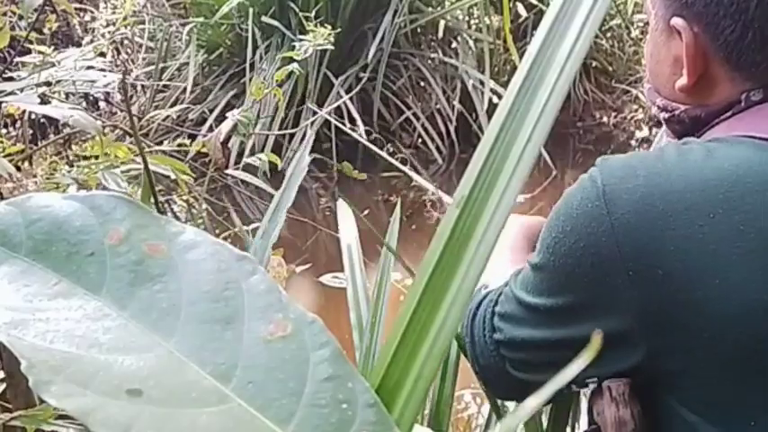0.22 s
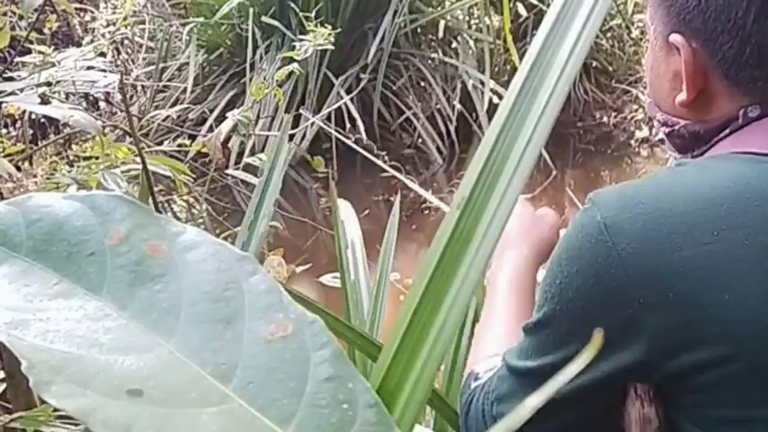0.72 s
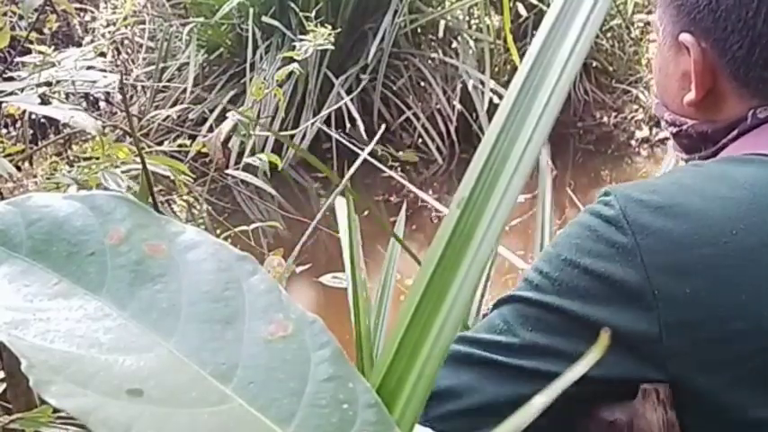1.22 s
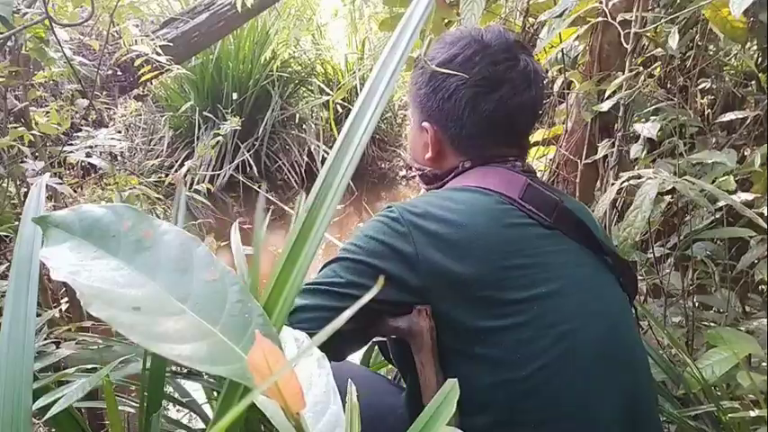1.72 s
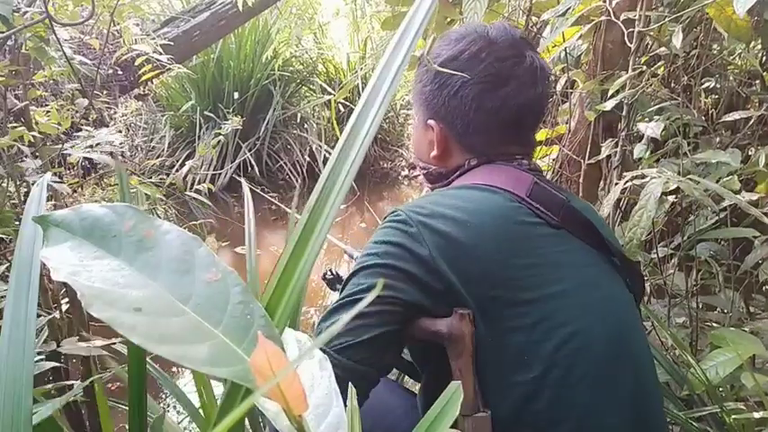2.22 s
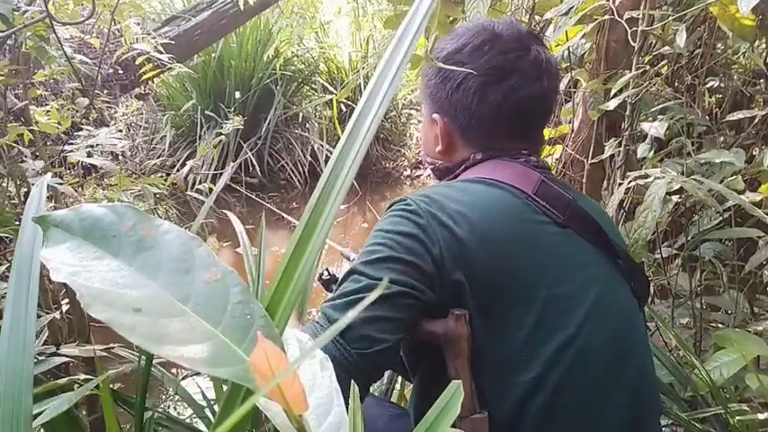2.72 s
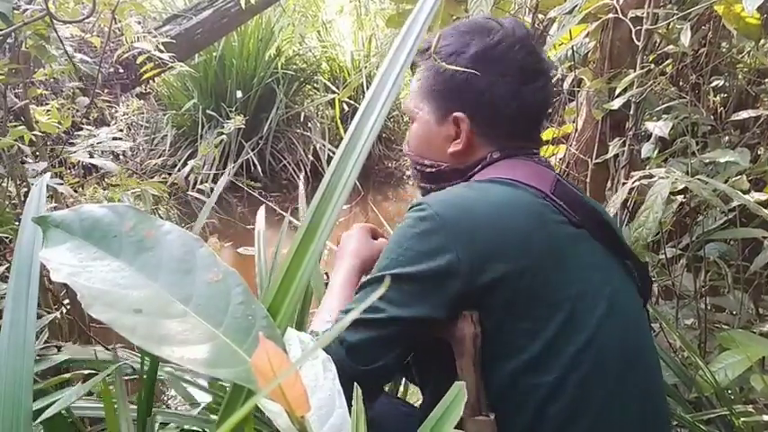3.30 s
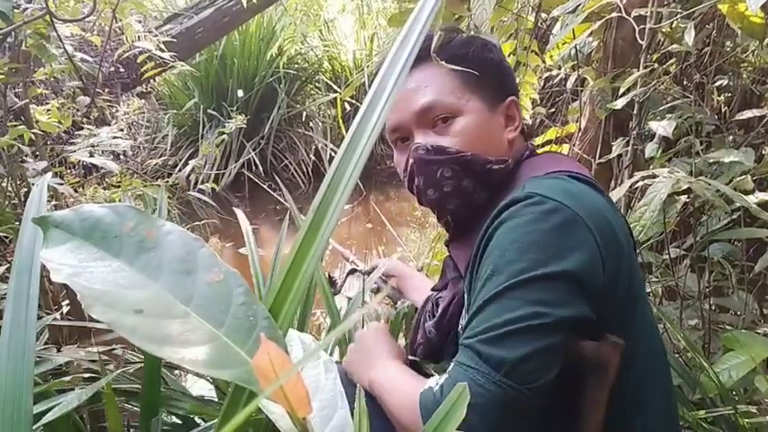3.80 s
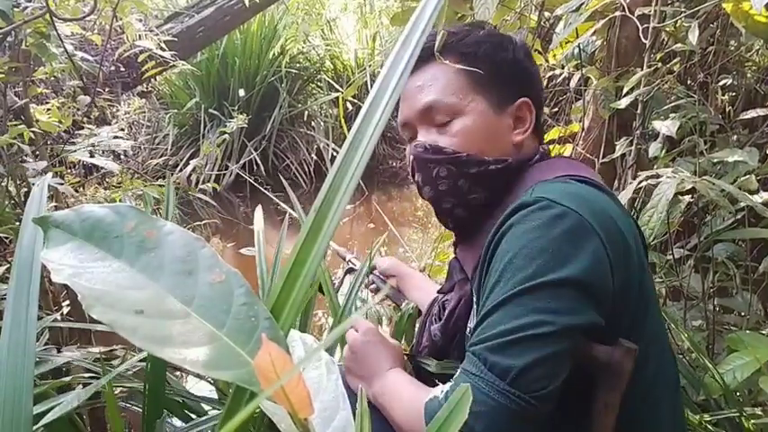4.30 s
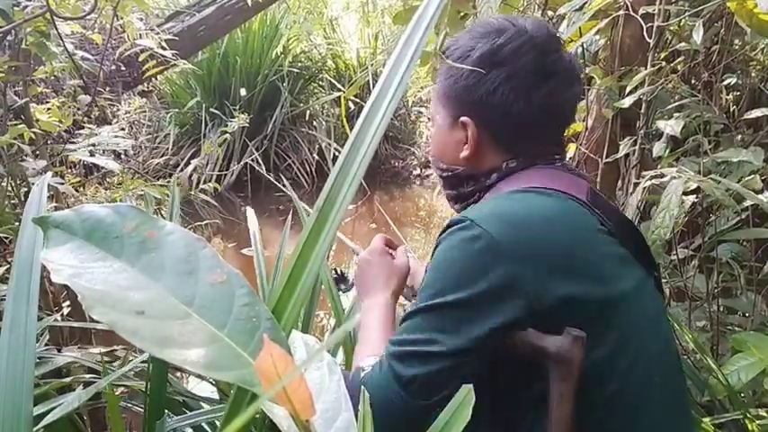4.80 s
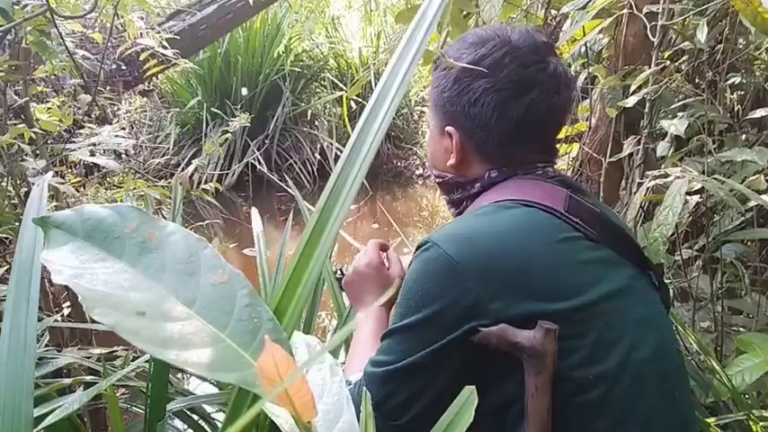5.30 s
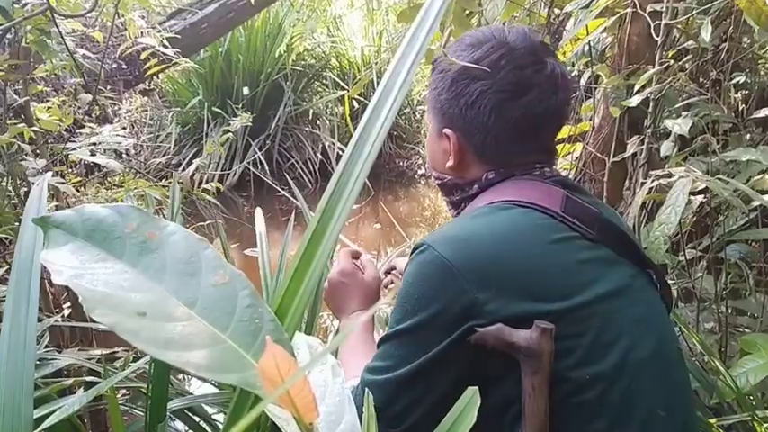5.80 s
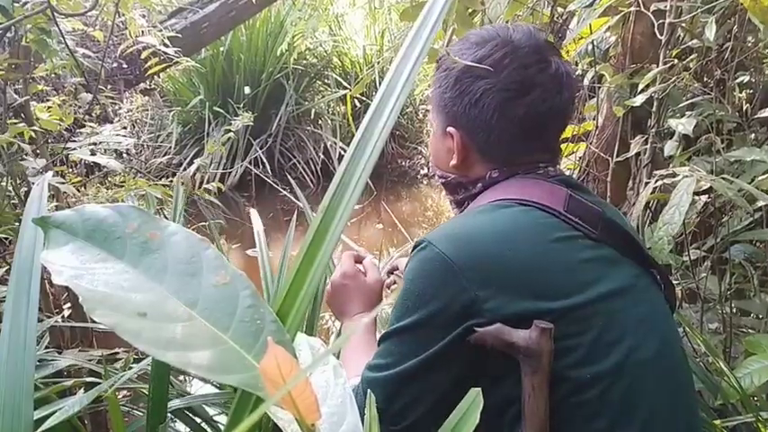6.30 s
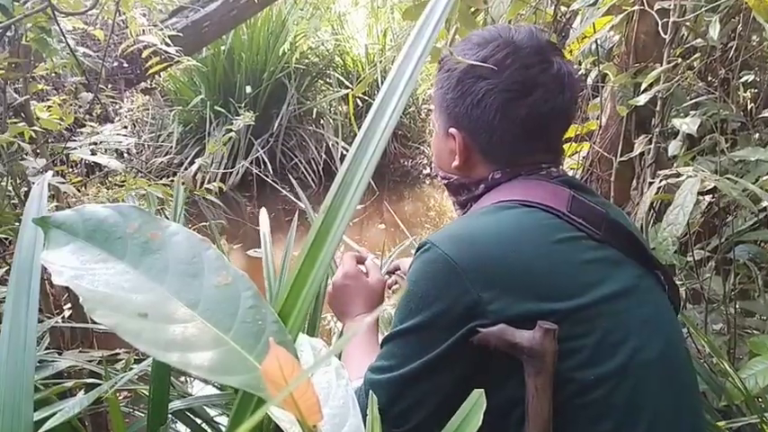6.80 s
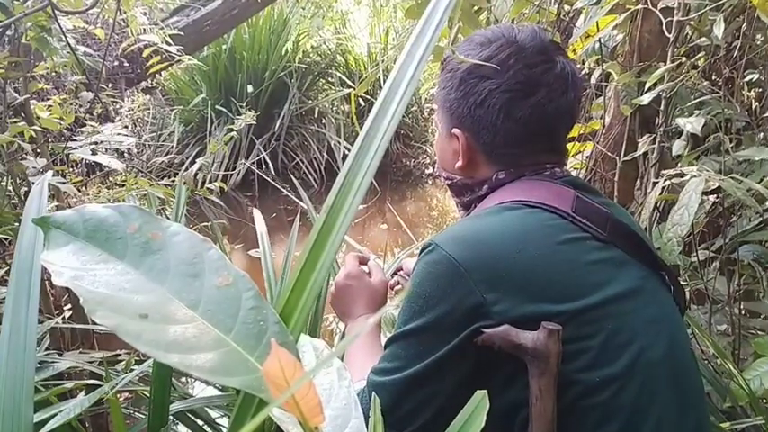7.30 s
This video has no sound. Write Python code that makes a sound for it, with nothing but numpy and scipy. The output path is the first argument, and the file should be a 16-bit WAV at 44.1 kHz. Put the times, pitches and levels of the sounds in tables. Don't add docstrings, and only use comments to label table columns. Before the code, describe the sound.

Shrill insect drone and echoing bird buzzes and trills in a forest, with a burst of close leaf scraping and stem snaps early on.

```python
import sys
import numpy as np
from scipy import signal
from scipy.fft import rfft, irfft
from scipy.io import wavfile
from scipy.ndimage import uniform_filter1d

SR = 44100
rng = np.random.default_rng(int(sys.argv[2]) if len(sys.argv) > 2 else 0)


def store_pcm(level_fs):
    pcm = np.round(np.clip(level_fs, -1, 1) * 32767).astype(np.int16)
    wavfile.write(sys.argv[1], SR, np.atleast_2d(pcm).T)


def field_ratio(decibels):
    return 10 ** (np.asarray(decibels, dtype=float) / 20)


N = 331632
T = np.arange(N) / SR


def evened(x):
    return x / np.sqrt(np.mean(x ** 2) + 1e-20)


def curve(tables, column):
    rows = np.vstack(tables)
    return np.interp(T, rows[:, 0], rows[:, column])


def add(mix, s, sound):
    part = mix[..., max(round(s * SR), 0):][..., :sound.shape[-1]]
    part += sound[..., :part.shape[-1]]


def coloured(x, points, stretch=1):
    hz = np.fft.rfftfreq(len(x), 1 / SR)
    point_hz, point_db = np.transpose(points)
    gain_db = np.interp(np.log(hz / stretch + 1), np.log(point_hz), point_db, -90, -90)
    return irfft(rfft(x) * field_ratio(gain_db), len(x))


def slow(hz):
    return evened(signal.lfilter([1], [1, -np.exp(-2 * np.pi * hz / SR)], rng.standard_normal(N)))


def ring(x, hz, width):
    turn = np.exp(2j * np.pi * hz * T)
    r = np.exp(-np.pi * width / SR)
    return (turn * signal.lfilter([1], np.convolve([1, -r], [1, -r]), x / turn)).real


def split(x, hz):
    low = signal.sosfilt(signal.butter(2, hz, fs=SR, output="sos"), x)
    return low, x - low


def choir(shape, db, octave_db):
    strength = field_ratio(0.29 * rng.exponential(1, N))
    clicks = strength * (rng.random(N) < .12) * rng.choice([-1, 1], N)
    body = evened(coloured(clicks, shape))
    octave = evened(coloured(clicks[::-1], shape, 2.03))
    return field_ratio(db + 0.47 * slow(5.5)) * (body + field_ratio(octave_db) * octave)


def cicadas():
    # pitch_hz, level_db (per Hz)
    low_band = [(5700, -36), (6000, -34.5), (6300, -21), (6700, -9), (7000, -5), (7500, -12.5), (8200, -32),
                (8700, -27.5), (9100, -37)]
    high_band = [(7000, -22), (7400, 1.5), (7800, 2), (8150, 2), (8500, -6.5), (8800, -17), (9200, -29.5)]
    # time_s, low_choir_db, high_choir_db
    loudness = [
        [(0.0, -49.5, -49), (0.626, -49.5, -47), (1.49, -50, -46.5)],
        [(1.52, -58.5, -72), (2.15, -46.5, -40.5), (2.9, -49.5, -51), (5.81, -49.5, -46.5),
         (7.52, -48.5, -54.5)],
    ]
    low_choir = choir(low_band, curve(loudness, column=1) + 1.65, 0.29)
    high_choir = choir(high_band, curve(loudness, column=2) - 1.5, -23)
    return low_choir + high_choir


def crickets():
    # time_s, steady_db, throbbing_db
    loudness = [(0, -77.5, -75), (.8, -63.5, -69.5), (1, -79, -57), (1.5, -73, -71), (1.51, -47.5, -45.5),
                (2.12, -48, -76.5), (2.25, -57, -53.5), (4, -76, -56), (6.2, -79, -60), (6.5, -65, -68),
                (7.2, -76, -68), (7.52, -74.5, -104)]
    # start_s, length_s, level_db
    rattles = [
        (.05, .05, -60),
        (.67, .04, -55),
        (.745, .025, -53),
        (1.455, .035, -52),
        (5.48, .07, -57),
        (6.16, .04, -58),
    ]
    steady = evened(ring(rng.standard_normal(N), hz=4760, width=300))
    pulses = np.cos(2 * np.pi * 12.78 * (T - 2.705))
    throb = np.maximum(pulses - .2, 0) * field_ratio(2.2 * slow(7.4))
    thin = evened(np.sin(2 * np.pi * np.cumsum(7768 + 18 * slow(15.1)) / SR) * throb)
    click_count = np.floor(np.cumsum(165 + 25 * slow(66)) / SR)
    rattle = evened(ring(np.diff(click_count, prepend=0), hz=5200, width=1200))
    gate = np.zeros(N)
    for s, length, db in rattles:
        add(gate, s, field_ratio(db) * np.hanning(round(length * SR)))
    steady_gain = field_ratio(curve(loudness, column=1))
    thin_gain = field_ratio(curve(loudness, column=2))
    return steady_gain * steady + thin_gain * thin + gate * rattle


def air():
    # pitch_hz, level_db (per Hz)
    hush_shape = [(12, -21), (20, 6), (77, -8), (126, -6.5), (163, -8), (449, -13.5), (596, -13.5),
                  (1610, -19), (1940, -19.5), (2400, -17.5), (5600, -39), (7280, -73), (12300, -120)]
    # time_s, level_db
    rumble_level = [
        (0.0, -57),
        (0.48, -52.5),
        (0.58, -55),
        (2.05, -54),
        (5.01, -53.5),
        (6.43, -47.5),
        (7.52, -53.5),
    ]
    hush = field_ratio(-58) * evened(coloured(rng.standard_normal(N), hush_shape))
    hiss = field_ratio(-67.0) * split(rng.standard_normal(N), hz=4500)[1]
    rumble = evened(ring(rng.standard_normal(N), hz=74.3, width=50.0))
    return hush + hiss + field_ratio(curve(rumble_level, column=1) - 7.0) * rumble


def rustling():
    # time_s, rustle_db
    stir = [(0, -64.5), (.41, -71.5), (.6, -64.5), (.94, -74), (1.3, -63.5), (1.36, -70), (1.5, -53),
            (1.515, -46.5), (2.36, -53.5), (2.6, -53.5), (2.89, -63), (3.2, -57.5), (3.6, -76.5),
            (4.22, -57), (4.6, -66), (5.38, -70), (5.91, -64), (7.52, -74)]
    # peak_s, length_s, level_db, heavy_blades_relative_db
    brushes = [(0.552, 0.0264, -51.5, 1), (0.996, 0.13, -61, -12.5), (1.33, 0.033, -63, -6),
               (1.64, 0.22, -44, 5), (1.733, 0.042, -52, 9), (1.892, 0.28, -46, 5.5),
               (2.002, 0.16, -46, -1.5), (2.125, 0.032, -40.5, -9), (2.18, 0.26, -45, 3.5),
               (2.32, 0.13, -44, 2), (2.424, 0.046, -49, 1), (2.5, 0.083, -50, -1),
               (2.69, 0.19, -53.5, -10), (3.116, 0.098, -54, -16), (3.28, 0.26, -55, 2.5),
               (3.5, 0.27, -58.5, 6), (3.746, 0.21, -64.5, 2), (4.546, 0.014, -53, -17),
               (4.74, 0.125, -60.5, 0), (5.505, 0.147, -76, -2), (5.953, 0.044, -69, 2),
               (6.174, 0.23, -58, 2), (6.954, .06, -67, 5)]
    stir_db = curve(stir, column=1)
    heavy_stir_db = stir_db + 2.5 - 0.4612 * (stir_db + 50.5)
    power = field_ratio(2 * np.array([stir_db, heavy_stir_db]))
    rise_share = 0.43
    for s, length, db, heavy_db in brushes:
        side = np.where(T < s, rise_share, 1 - rise_share) * length
        peak = field_ratio(2 * np.array([[db], [db + heavy_db]]))
        power = power + peak * np.exp(-2 * (abs(T - s) / side) ** 1.57)
    return np.sqrt(power)


def patchy(x):
    z = signal.stft(x, nperseg=256)[2]
    patches = uniform_filter1d(rng.standard_normal(z.shape), size=5, axis=0)
    patches = uniform_filter1d(patches, size=6, axis=1)
    return signal.istft(z * field_ratio(2.1 * evened(patches)), nperseg=256)[1][:N]


def leaves():
    # pitch_hz, level_db (per Hz)
    leaf_shape = [(71, -60), (120, -15), (173, -17), (249, -14), (390, -12.5), (700, -8), (1000, -7),
                  (1350, -7), (1680, -7), (2850, -3), (3430, -7), (4840, -8.5), (5470, -10), (7880, -1),
                  (9270, -11), (12300, -10), (15400, 3.5)]
    strength = field_ratio(1.3 * np.minimum(rng.exponential(1, N), 4))
    grains = strength * (rng.random(N) < .06) * rng.choice([-1, 1], N)
    catches = rng.random(N) * (rng.random(N) < 110 / SR)
    clumps = .6 + signal.lfilter([1], [1, -np.exp(-1 / (.007 * SR))], catches)
    scrape = (evened(grains) + 0.92 * rng.standard_normal(N)) * clumps ** 0.25
    low, high = split(evened(patchy(coloured(scrape, leaf_shape))), hz=2600)
    light, heavy = rustling()
    return field_ratio(12.0) * light * high + field_ratio(9.5) * heavy * low


def whistle(hz, db, far, edge=.3, shake=0.4):
    chance = uniform_filter1d(rng.standard_normal((2, len(hz))), size=120) * np.sqrt(120)
    waver, flutter = shake * chance
    phase = 2 * np.pi * np.cumsum(hz * (1 + 0.0178 * waver)) / SR
    tone = field_ratio(db + 0.5 + 4.0 * flutter) * np.sin(phase)
    tone *= signal.windows.tukey(len(hz), edge)
    far = np.clip(far, 0, 1) * np.ones(len(hz))
    return tone * np.array([np.cos(far * np.pi / 2), np.sin(far * np.pi / 2)])


def note(length, first, last, db, far):
    hz = np.linspace(first, last, round(length * SR))
    return whistle(hz, db - 12 * np.maximum(1 - hz / first, 0), far, 0.26, shake=0.19 + 1.4 * far)


def buzz(length, last_db, pitch, centre):
    # length_share (0-1), low_hz, high_hz
    reach = [
        (0, 2852, 3990),
        (.3, 2600, 4217),
        (0.7, 2472, 4318),
        (.88, 2825, 4333),
        (1.002, 3533, 4190),
    ]
    # length_share (0-1), relative_db, distance (0-1)
    swell = [
        (0, -7, 0.46),
        (.28, -8, 0.76),
        (.65, -2, 0.73),
        (1, 0, 1),
    ]
    t = np.arange(0, length, 1 / SR)
    share, low, high = np.transpose(reach)
    low = pitch * np.interp(t / length, share, low)
    high = pitch * np.interp(t / length, share, high)
    share, swell_db, far = np.transpose(swell)
    uneven = evened(uniform_filter1d(rng.standard_normal(len(t)), size=900))
    turns = 2 * np.pi * (56 * t + rng.random() + .07 * uneven)
    height = .5 + signal.sawtooth(turns, .6) / 2
    height = uniform_filter1d(height, size=130)
    off_centre = height - centre - 0.015 * t / length
    db = last_db + np.interp(t / length, share, swell_db) - 30 * off_centre ** 2
    db = db + 1.5 + 0.77 * np.sin(turns)
    return whistle(low + (high - low) * height, db, np.interp(t / length, share, far), 0.022)


def syllable(shape, db, far):
    s, hz, shape_db = np.transpose(shape)
    t = np.arange(0, s[-1], 1 / SR)
    pitch = uniform_filter1d(np.interp(t, s, hz), size=60)
    return whistle(pitch, db + np.interp(t, s, shape_db), far, 0.079)


def buzzing_bird():
    # start_s, length_s, final_level_db, reach_factor, loudest_height (0-1)
    buzzes = [
        (0, 0.21, -46.5, 0.93, 0.65),
        (0.622, 0.3, -37, 1, 0.54),
        (1.032, 0.17, -48.5, 1.01, 0.35),
        (1.505, 0.19, -34.5, 0.99, 0.5),
        (2.743, 0.3, -36, 0.99, 0.6),
        (4.087, 0.36, -38, 0.99, 0.61),
        (5.186, 0.37, -39.5, 0.9943, 0.61),
        (5.999, 0.12, -46.5, 0.98, 0.4),
        (6.489, 0.34, -39.5, 1.04, 0.59),
    ]
    # time_s, pitch_hz, level_db
    hook = [(0, 3724, -4), (.007, 3487, 10.5), (.012, 2513, 9.5), (.018, 2445, -5), (.022, 3379, 10.5),
            (.029, 4150, 12), (.037, 4500, -1.5), (.062, 4250, -20)]
    step = [(0, 3673, -5), (.01, 3355, -6), (.018, 3060, -7), (.024, 3724, 0.5), (.031, 4265, -2),
            (.036, 4420, -9), (.058, 4300, -32)]
    drop = [(0, 4483, -2.5), (.006, 3805, 0.5), (.014, 2505, 1), (.022, 2047, -16), (.027, 2750, 4.5),
            (.033, 3284, 0), (.056, 3150, -10)]
    # start_s, level_db, distance (0-1)
    hooks = [
        (0.445, -43, 0.51),
        (2.53, -49, 0.8),
        (3.925, -46, 0.7),
    ]
    steps = [
        (3.725, -47, 0.76),
        (4.742, -45, 0.98),
        (5.021, -35, 0.8),
        (5.681, -46, 1),
        (6.301, -33, 0.54),
    ]
    drops = [
        (1.2, -38.5, 0.56),
        (2.526, -36, 0.36),
        (5.92, -38, 0.63),
    ]
    # start_s, length_s, first_hz, level_db
    closers = [
        (.925, 0.046, 3960, -34),
        (.195, 0.023, 3730, -54),
        (.985, 0.029, 4020, -45),
        (1.742, 0.055, 3600, -35),
        (1.818, .01, 3920, -39),
        (4.43, 0.052, 3977, -38.5),
        (5.53, 0.065, 4040, -35),
        (6.82, 0.051, 3790, -42),
    ]
    # start_s, length_s, pitch_hz, level_db
    chips = [(0.548, 0.011, 3013, -38.5), (.564, 0.021, 3160, -39), (0.597, 0.0052, 3113, -36.5),
             (1.313, 0.0079, 2450, -36.5), (1.352, .01, 3270, -58), (1.367, 0.01, 3200, -57),
             (2.639, 0.0089, 2480, -33.5), (4.035, 0.013, 3150, -39.5), (4.058, 0.012, 3100, -39),
             (5.138, 0.04, 3127, -43.5), (5.19, 0.012, 3120, -44), (6.415, 0.045, 3050, -42),
             (1.257, 0.029, 3230, -47), (1.31, .012, 3260, -52), (1.205, 0.0074, 3900, -36),
             (0.633, .01, 2450, -47)]
    paths = np.zeros((2, N))
    for s, *row in buzzes:
        add(paths, s, buzz(*row))
    for shape, sung in ((hook, hooks), (step, steps), (drop, drops)):
        for s, db, far in sung:
            add(paths, s, syllable(shape, db, far))
    for s, length, first, db in closers:
        add(paths, s, note(length, first, 3962, db, far=0.2))
    for s, length, hz, db in chips:
        add(paths, s, note(length, hz, hz, db, far=0.37))
    return paths


def other_calls():
    # start_s,
    # length_s, first_hz, last_hz, level_db
    far_notes = [(.005, 0.018, 3940, 4060, -54), (1.27, 0.034, 3830, 3850, -58),
                 (.31, 0.045, 3800, 3780, -62), (1.605, 0.027, 2690, 3910, -43),
                 (1.71, 0.037, 3200, 3590, -42), (3.711, 0.042, 2950, 2840, -56),
                 (4.423, 0.019, 2190, 2030, -46.5), (4.565, 0.014, 2100, 2450, -50),
                 (3.806, 0.056, 2910, 3190, -54.5), (5.817, 0.043, 3280, 2920, -55),
                 (5.818, 0.019, 1700, 1920, -52), (6.955, .03, 1840, 1830, -57),
                 (7.324, 0.031, 2050, 1824, -51.5), (7.386, 0.022, 2150, 1820, -51)]
    # start_s, length_s, first_hz, last_hz, level_db
    near_notes = [(3.072, .015, 2580, 2420, -31), (5.953, .02, 3320, 3250, -40),
                  (6.114, .034, 3780, 3770, -50), (6.764, .028, 2450, 2450, -49),
                  (7.046, .022, 1850, 1870, -53), (6.535, .014, 2430, 2430, -48),
                  (.205, .012, 3760, 3760, -49), (4.446, .011, 3170, 3170, -35),
                  (2.644, .015, 3130, 3140, -35), (2.556, .014, 3280, 3230, -37),
                  (3.935, .01, 2500, 2450, -40)]
    # start_s, length_s, first_hz, last_hz, level_db
    lost_notes = [
        (3.295, .09, 3500, 3950, -59),
        (3.385, .07, 3850, 3950, -61),
        (2.535, .05, 3500, 3800, -43),
    ]
    paths = np.zeros((2, N))
    for rows, far in ((far_notes, 0.63), (near_notes, .12), (lost_notes, 1)):
        for s, *row in rows:
            add(paths, s, note(*row, far))
    return paths


def trill(s, end, last_db, upper_db, per_s, first, last, far, swell_db, late, link_db, tilt):
    paths = np.zeros((2, N))
    for at in np.arange(s, end, per_s ** -1):
        done = (at - s) / (end - s)
        db = last_db - swell_db * (1 - done ** late) + .8 * rng.standard_normal()
        sweep = .16 * far - tilt
        pip_hz = (first + (last - first) * done) * np.linspace(1 + sweep, 1 - sweep, 470)
        pip = whistle(pip_hz, db, far, 0.67, shake=far ** 2)
        add(paths, at - .0059 + .0006 * rng.standard_normal(), pip)
        upper_hz = (2680 + 320 * done ** .6) * np.linspace(.93, 1.07, 400)
        upper_pip = whistle(upper_hz, db + upper_db - 16 * (1 - done) ** 3.9, far + 0.5, 0.92)
        add(paths, at + 0.007, upper_pip)
    done = np.linspace(0, 1, round((end - s) * SR))
    between = np.sin(np.pi * per_s * done * (end - s)) ** 2
    hum_db = 2 + last_db + link_db - swell_db * (1 - done ** late)
    hum = whistle(first + (last - first) * done, hum_db, far + 0.51, 0.13, shake=1.13)
    add(paths, s, between * hum)
    return paths


def trilling_bird():
    # first_pip_s, end_s, last_level_db, upper_pip_relative_db
    trills = [
        (.009, 0.327, -33.5, -0.5),
        (1.386, 1.49, -36.5, -17),
        (2.714, 3.071, -30.5, -5.5),
        (4.598, 4.94, -32, -2.5),
        (6.196, 6.488, -35, -3.5),
    ]
    # pips_per_s, first_hz, last_hz, distance (0-1)
    voices = [
        (43.0, 2500, 2780, .6),
        (43.0, 2480, 2600, .33),
        (42.95, 2510, 2570, .2),
        (43.25, 2540, 2600, .24),
        (43.7, 2500, 2680, .7),
    ]
    # swell_db, swell_lateness (0-2), link_relative_db, pip_rise (0-1)
    growth = [
        (11, 0.63, -15, .05),
        (6, 0.92, -19, 0.06),
        (8, 0.85, -11, .01),
        (11.5, 0.65, -12, 0.11),
        (7.5, 0.49, -10, 0),
    ]
    # start_s, length_s, first_hz, level_db
    falls = [
        (.324, 0.051, 2980, -33.5),
        (1.899, 0.0063, 2900, -28),
        (3.08, 0.026, 2550, -42),
        (4.94, 0.037, 2675, -33),
        (6.03, 0.012, 2600, -42),
        (6.14, 0.013, 2420, -42.5),
        (6.177, 0.0083, 2310, -47),
        (6.479, 0.032, 2620, -38),
    ]
    # start_s, length_s, first_hz, last_hz, level_db, distance (0-1)
    lift = (4.519, 0.017, 2080, 2640, -45, .25)
    paths = np.zeros((2, N))
    for row, voice, swell in zip(trills, voices, growth):
        paths += trill(*row, *voice, *swell)
    for s, length, first, db in falls:
        add(paths, s, note(length, first, 2080, db, far=0.3))
    add(paths, lift[0], note(*lift[1:]))
    return paths


def leaf_squeak():
    # start_s, length_s, first_hz, last_hz, level_db, distance (0-1)
    squeak = (3.197, .032, 11800, 12300, -55, .2)
    paths = np.zeros((2, N))
    add(paths, squeak[0], note(*squeak[1:]))
    return paths


def trees(x):
    out = np.zeros(N)
    for k in range(3):
        at = np.arange(0, SR - 20, 20)
        at = at + rng.integers(0, 20, len(at))
        t = at / SR
        decay = field_ratio(-60 * t / 0.37) + field_ratio(-6.0 - 60 * t / 0.8)
        echoes = np.zeros(SR)
        echoes[at] = rng.choice([-1., 1.], len(at)) * decay * (1 - np.exp(-t / 0.00095))
        share = np.sqrt(2 / 3) * np.cos(2 * np.pi * (7 * T + k / 6))
        out += signal.fftconvolve(x * share, echoes / np.linalg.norm(echoes))[:N]
    return out


def calls_among_trees():
    # pitch_hz, level_db
    scatter = [(1200, -7), (2300, -6), (3200, -1), (4200, 1), (6000, 0)]
    direct, scattered = buzzing_bird() + other_calls() + trilling_bird() + leaf_squeak()
    echo = coloured(trees(scattered), [(20, -12)] + scatter + [(20000, 0)])
    return direct + field_ratio(4.5) * echo


def snaps():
    # start_s, peak_db, low_relative_db
    ticks = [(.127, -35, -22), (1.005, -39.5, -27), (1.301, -28, -28), (1.3871, -31, -12),
             (1.4788, -38, -22), (2.412, -17, -27), (2.4818, -19, -21), (2.5154, -23, -25),
             (2.732, -21, -29), (2.901, -38, -13), (3.1946, -50, -4), (3.317, -29, -23), (3.437, -35, -14),
             (3.561, -31, -22), (3.681, -29, -13), (3.727, -32, -17), (3.749, -31, -21),
             (4.5461, -42, -17.5), (4.66, -29, -24), (4.698, -32, -18), (7.0886, -46.5, -13)]
    # start_s, peak_db, middle_relative_db
    cracks = [(0.7578, -29.5, -15), (1.605, -34, -4.5), (1.732, -17, -5), (1.954, -16, 7),
              (2.122, -26.5, 17), (2.2762, -36, 10), (2.288, -14.5, 0), (2.3246, -25, 2.5),
              (2.7056, -41, -4), (3.605, -43, -9), (3.6293, -32, 2), (4.77, -41, -4), (5.9463, -45, -2),
              (6.172, -43, 1)]
    # start_s, peak_db, low_relative_db
    pops = [
        (.545, -35, 5.5),
        (.6894, -32, -19),
        (1.837, -43, 8),
        (2.6555, -25.5, -2.5),
        (3.089, -36, 1),
        (4.4702, -45, 15.5),
        (4.655, -46, 12),
        (5.169, -44, 1),
        (5.783, -55, 14),
        (6.852, -47.5, 16),
    ]
    # start_s, peak_db
    crackles = [(1.519, -31), (1.604, -21), (1.731, -14), (1.888, -22), (1.9154, -19), (2.1234, -21),
                (2.214, -25), (2.2719, -15), (2.4108, -36), (2.4821, -25), (2.533, -32), (2.5594, -36)]
    # start, peak dB, middle and low relative dB
    rows = [(s, db, -6, low_db) for s, db, low_db in ticks]
    rows += [(*row, -25) for row in cracks]
    rows += [(s, db, -14, low_db) for s, db, low_db in pops]
    rows += [(s, db - 3.5, 0, -21) for s, db in crackles]
    out, t = np.zeros(N), np.arange(1400) / SR
    bass_cut = signal.butter(3, 800, "high", fs=SR, output="sos")
    envelope = (field_ratio(-60 * t / 0.032) + field_ratio(-18 - 60 * t / 0.36)) * (1 - np.exp(-t / .001))
    for s, db, middle_db, low_db in rows:
        low, rest = split(rng.standard_normal(len(t)) * envelope, hz=2310)
        low = signal.sosfilt(bass_cut, low)
        middle, high = split(rest, hz=6500)
        snap = field_ratio(-10.0) * high + field_ratio(middle_db - 13.5) * middle + field_ratio(low_db + 4.0) * low
        add(out, s - .001, field_ratio(db) * snap)
    return out


def taps():
    # start_s, peak_db, pitch_hz
    stems = [(1.571, -35.5, 870), (1.593, -30, 1580), (1.655, -29, 1850), (1.714, -41, 800),
             (1.821, -35, 1890), (1.839, -25, 1350), (1.893, -29, 2800), (1.954, -30, 2820),
             (2.122, -28, 2720), (2.156, -33, 2800), (2.179, -20, 2950), (2.266, -35, 886),
             (2.274, -26, 3200), (2.288, -31, 1400), (2.324, -35, 1210), (2.326, -32, 2900),
             (2.478, -39, 907), (4.685, -46, 720), (6.465, -42, 1040)]
    out, t = np.zeros(N), np.arange(1800) / SR
    for (s, db, hz), (shift, turn) in zip(stems, rng.random((len(stems), 2))):
        second = np.sin(2 * np.pi * (hz * (1.16 + .15 * shift) * t + turn))
        pair = np.sin(2 * np.pi * hz * t) + 0.42 * second
        fading = field_ratio(db - 30 * t * hz / 13)
        add(out, s - .001, fading * (1 - np.exp(-t / .001)) * pair)
    return out


def knocks():
    # start_s, peak_db
    bumps = [
        (2.65, -36),
        (3.055, -35.5),
        (3.246, -48),
        (3.497, -40),
        (4.059, -45),
        (4.149, -47),
        (4.329, -36.5),
        (6.19, -44),
    ]
    out, t = np.zeros(N), np.arange(4000) / SR
    for s, db in bumps:
        bump = split(split(rng.standard_normal(len(t)), hz=435)[0], hz=121)[1]
        add(out, s, field_ratio(db - 11 - 60 * t / .25) * evened(bump) * (1 - np.exp(-t / .008)))
    return out


def scene():
    insects = cicadas() + crickets()
    close_by = leaves() + snaps() + taps() + knocks()
    mono = insects + air() + calls_among_trees() + close_by
    return np.array([mono, mono])


def roll_off(x):
    return signal.sosfilt(signal.butter(12, 16720, fs=SR, output="sos"), x)


def record(dry):
    gap = T - 1.502
    fade = np.clip(np.where(gap < 0, -gap / .011, gap / .024) + .15, 0, 1)
    band_limit = signal.firwin(1023, 15530, window=("kaiser", 10), fs=SR)
    limited = signal.oaconvolve(dry * fade, band_limit[None], "same")
    return roll_off(limited)


dry = scene()
out = record(dry)
store_pcm(out)
```